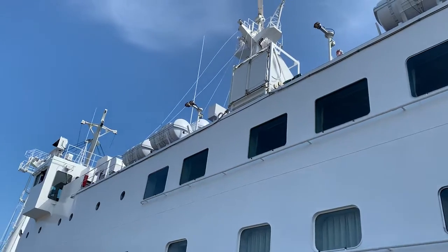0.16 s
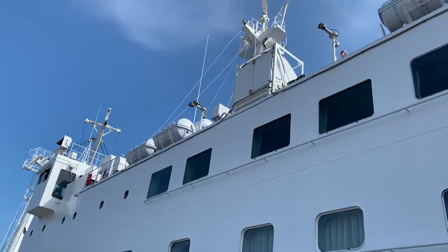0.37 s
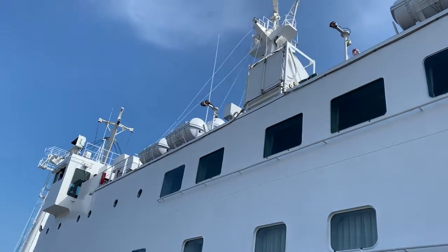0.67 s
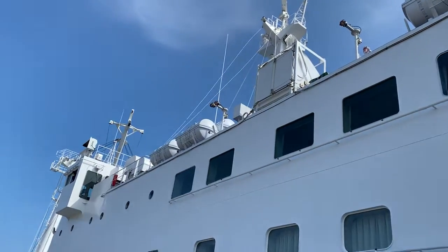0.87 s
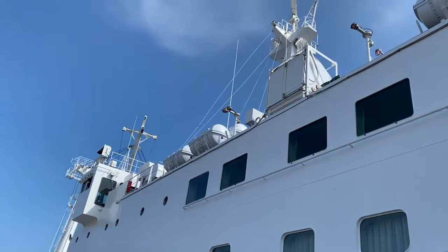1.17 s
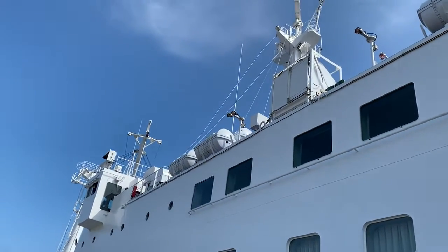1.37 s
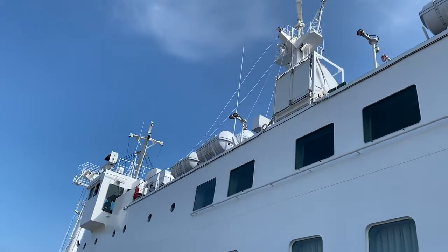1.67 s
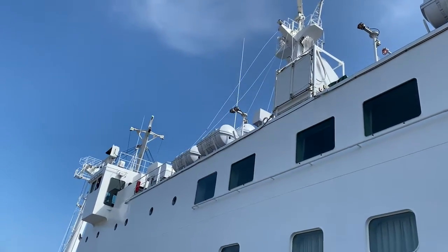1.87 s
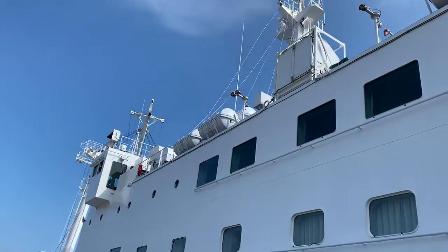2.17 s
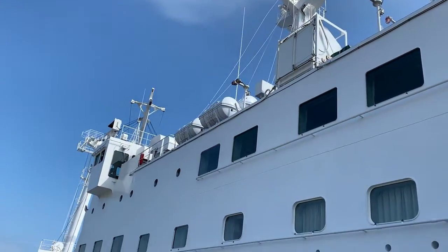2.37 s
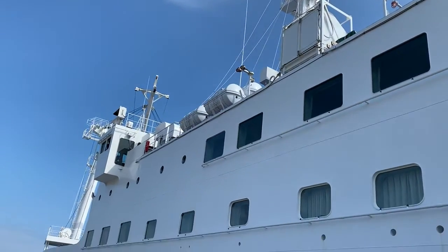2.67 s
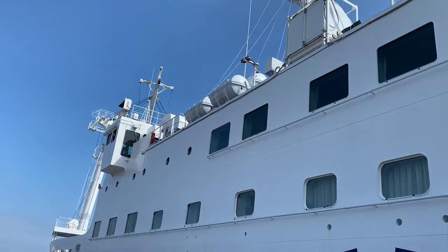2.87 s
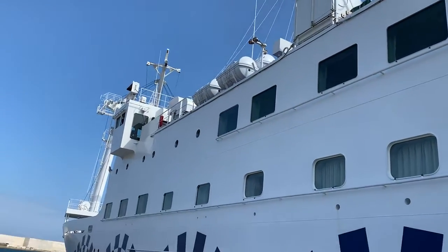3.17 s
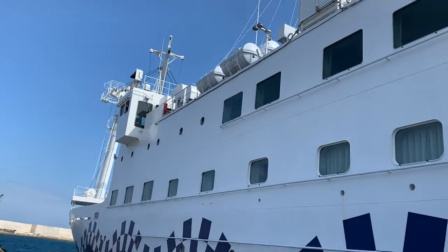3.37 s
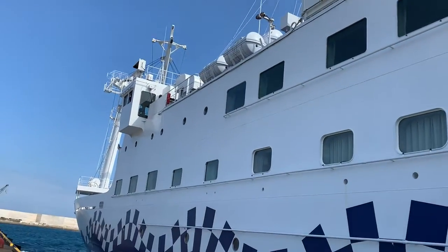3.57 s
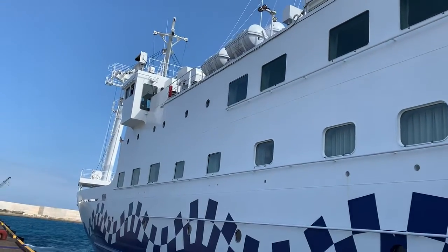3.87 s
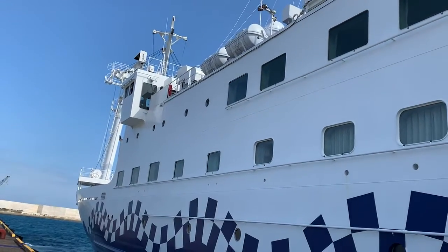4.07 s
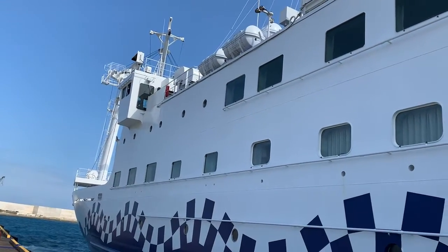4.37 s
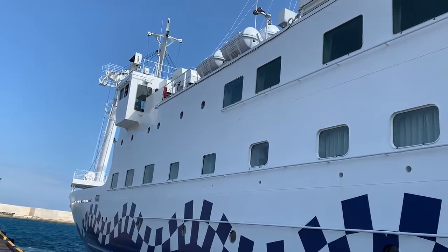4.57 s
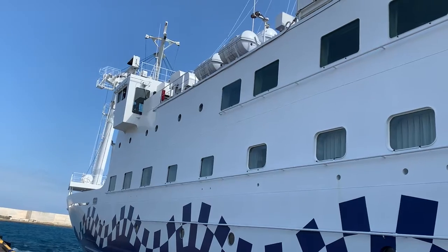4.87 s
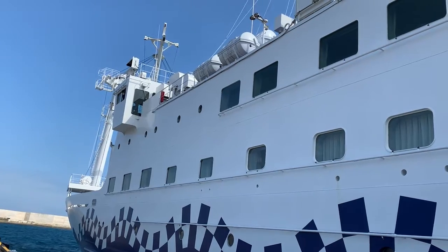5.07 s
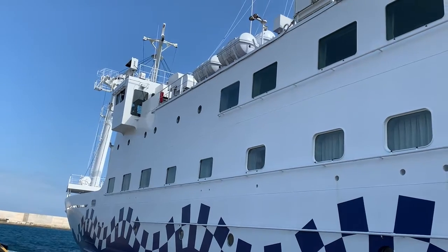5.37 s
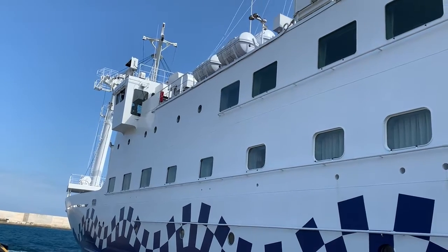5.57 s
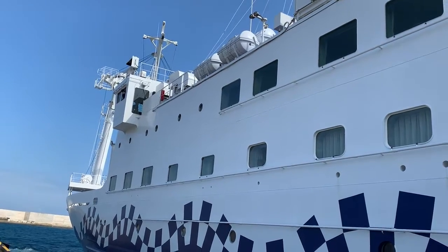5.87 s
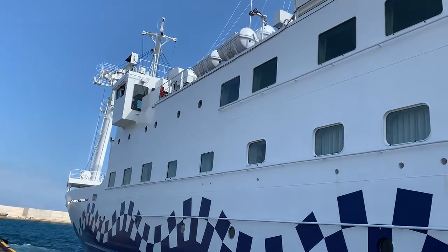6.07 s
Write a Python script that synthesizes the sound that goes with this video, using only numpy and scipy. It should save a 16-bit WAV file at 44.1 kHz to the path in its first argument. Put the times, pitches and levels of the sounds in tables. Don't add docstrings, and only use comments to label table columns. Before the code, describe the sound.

The sound begins in the middle of a ferry horn blast: one loud, low, steady note, around 180 hertz, thick with buzzing brassy overtones and hiss pulsing with the note. Its pitch never moves, but reflections make the tone shimmer and waver, brightening a little at moments. Wind buffets softly underneath. At about 2.25 seconds the horn stops abruptly with a tiny puff of air; the quay answers at once, the breakwater until about 2.6, and a thin, far-off echo of the same note fades until about 4.4. Small wind thumps come around 2.4 to 2.9, then a calmer gap with a low distant wash of engines and water. From about 4.1 to the end near 6.2, gusts rumble and flap on the close stereo microphone, with short crackling slaps, strongest around 4.9, 5.25 and 5.6, leaning left.

```python
import sys
import numpy as np
from scipy import signal
from scipy.io import wavfile
from scipy.ndimage import uniform_filter1d

SR = 44100
rng = np.random.default_rng(int(sys.argv[2]) if len(sys.argv) > 2 else 0)


def log_audio(samples):
    frames = np.atleast_2d(samples).T
    limited = np.clip(frames, -1, 1)
    pcm = np.round(limited * 32767).astype(np.int16)
    wavfile.write(sys.argv[1], SR, pcm)


def elevation(decibels):
    levels = np.asarray(decibels, float)
    return 10 ** (levels / 20)


N = 273640

PITCH_HZ = 179.45
PORT_DELAY_S = 0.00023
CALM_DB = -41.5

# f/Hz, likeness/-1 to 1
PORT_LIKENESS = [(60, 0.67), (150, 0.7), (380, 0.4), (950, 0.078), (2380, -0.019), (5980, -0.058),
                 (15000, -0.078)]
# t/s, level/dB
BREEZE = [(0.0, -34), (0.6, -33.5), (1.45, -36.5), (1.6, -41.5), (1.93, -39.5), (2.05, -34.5), (2.6, -44),
          (3.0, -47.5), (4.0, -57), (4.4, -46.5), (4.8, -65), (5.1, -43.5), (5.6, -43), (5.9, -43),
          (6.2, -46)]


def evened(x):
    return x / np.sqrt(np.mean(abs(x) ** 2) + 1e-20)


def read(points, hz):
    f, value = np.transpose(points)
    return np.interp(np.log(hz + 1), np.log(f + 1), value)


def column(rows, t, order):
    return np.interp(t, [r[0] for r in rows], [r[order] for r in rows])


def bump(t, s, half_s):
    return np.exp(-((t - s) / half_s) ** 2)


def wander(t, hz):
    f = np.geomspace(hz / 12, hz, 10) * rng.choice([-1, 1], 10)
    phasors = np.exp(2j * np.pi * (f * t[:, None] + rng.random(10)))
    return evened((phasors / abs(f) ** 0.1).sum(1))


def noise(shape, likeness, size, patchy_db, flicker_db, flicker_s):
    hop = size // 4
    frames, hz = N // hop + 5, np.fft.rfftfreq(size, 1 / SR)
    a, b, c, d, patches = rng.standard_normal((frames, len(hz), 5)).T
    patches = evened(uniform_filter1d(uniform_filter1d(patches, 5, 0), 8, 1))
    same = np.clip(read(likeness, hz), -1, 1)[:, None]
    left = a + 1j * b
    right = same * left + np.sqrt(1 - same ** 2) * (c + 1j * d)
    z = np.array([left, right])
    z *= elevation(shape(hz[:, None], np.arange(frames) * hop / SR) + patchy_db * patches)
    span = max(int(flicker_s * SR), 1)
    lumps = evened(uniform_filter1d(uniform_filter1d(rng.standard_normal(N), span), span))
    return signal.istft(z, nperseg=size, noverlap=size - hop)[1][:, :N] * elevation(flicker_db * lumps)


def loudness(t, order):
    # held level/dB, release/dB per s, quay echo/dB, breakwater echo/dB
    voices = [
        (-13.5, 108, -15.5, -16.5),
        (-14.5, 300, -17.5, -18),
        (-26, 141, -17, -19),
        (-37, 89, -2.5, -32),
    ]
    # level under the note/dB, fade/dB per s
    far_shore = [
        (-20.5, 23),
        (-38, 35),
        (-26.5, 3),
        (-28, 4),
    ]
    echo_delays = [
        0.14,
        0.352,
    ]
    # t/s, level/dB
    pressure = [(0.0, -3), (0.3, 0), (0.55, -1.5), (1.13, 1), (1.26, 0), (1.39, 2), (1.54, -0.5), (1.99, 1),
                (2.2, -2)]
    pressure_share = (0.046, 0.05, 0.84, 1.0)
    # t/s, depth/dB
    dents = [(0.33, 6.5), (0.46, 1), (0.5, 3), (0.73, 5.5), (0.87, -2.5), (1.14, 2.5), (1.37, 4),
             (1.46, 2.5), (1.52, 5), (2.16, -2)]
    dent_share = (1.06, 1.34, 0.076, 0.1)
    stop_s, far_end_s = 2.252, 4.37
    held_db, release, *echo_db = voices[order]
    far_db, fade = far_shore[order]
    since_stop = np.maximum(t - stop_s, 0)

    gain = elevation(-release * since_stop) ** 2
    for late, db in zip(echo_delays, echo_db):
        gain = gain + elevation(db - 810 * np.maximum(t - stop_s - late, 0)) ** 2
    gain = gain + elevation(far_db - fade * since_stop - 27 * np.maximum(t - far_end_s, 0)) ** 2
    db = held_db + 10 * np.log10(gain) + pressure_share[order] * column(pressure, t, order=1)
    db = db - dent_share[order] * sum(depth * bump(t, s, half_s=0.015) for s, depth in dents)

    cancel_db, clear_s, clearing_s, grow_db_per_s = -13.5, 0.45, 0.026, 2.0
    cancelled = cancel_db / (1 + np.exp((t - clear_s) / clearing_s))
    cancelled = cancelled + grow_db_per_s * np.minimum(t - stop_s, 0)
    return db + (order == 1) * cancelled


def horn():
    # multiple, level/dB
    overtones = [(1, 0), (2, -4), (3, -20), (4, -22), (5, -18.5), (6, -26), (7, -27.5), (8, -23.5),
                 (9, -27.5), (10, -39), (11, -29.5), (12, -22.5), (13, -30), (14, -27), (15, -30),
                 (16, -34), (17, -29), (18, -43), (19, -32.5), (20, -38), (21, -52.5), (22, -31.5),
                 (23, -34), (24, -39.5), (25, -43), (26, -39), (27, -54), (28, -40.5), (29, -38), (30, -53)]
    # f/Hz, level/dB
    top_overtones = [(3180, -31), (5400, 1), (5900, -2.5), (6170, 4.5), (6710, 1), (7500, -17.5),
                     (7900, -10.5), (8190, -3.5), (8830, -3.5), (9520, -7), (10900, -6.5), (11800, -57),
                     (12300, -14), (13300, -18), (15600, 5.5)]
    # f/Hz, left minus right/dB
    horn_pan = [(180, -3), (360, 2), (3000, 1.5), (3900, -2), (4500, -3), (5500, -5), (9000, 1.5),
                (15000, -2)]
    # share/0-1, beat/Hz, first dip left t/s, first dip right t/s, left minus right/dB
    beats = [(0.6, 0.55, 1.72, 1.64, 6.1), (0.45, 0.2, 4.04, 4.76, -4.2), (0.3, 0.4, 1.48, 0.16, -2.1),
             (0.45, 0.95, 0.2, 0.24, -2.8), (0.3, 0.3, 1.8, 2.48, -1.6), (0.9, 0.3, 2.64, 3.28, 0.4),
             (0.45, 1.15, 0.2, 0.24, -0.6), (0.45, 1.0, 0.6, 0.56, -0.9), (0.3, 0.55, 1.8, 1.2, 8.6),
             (0.3, 1.0, 0.16, 0.88, 0.5), (0.9, 0.35, 2.8, 2.84, 2.5), (0.75, 0.3, 0.56, 3.08, 3.2),
             (0.45, 0.4, 0.56, 0.52, -2.5), (0.45, 1.5, 0.32, 0.32, -0.9)]
    # share/0-1, f/Hz, first dip t/s
    sway = (0.5, 1.67, 0.52)
    t, out = np.arange(int(4.5 * SR)) / SR, np.zeros((2, N))
    slow = t[::128]
    multiples = np.arange(1, 86)
    top_db = -43 + read(top_overtones, multiples[30:] * PITCH_HZ)
    order_db = np.append(np.transpose(overtones)[1], top_db)
    group = np.digitize(multiples, [2, 3, 17])
    for g in range(4):
        order_db[group == g] -= 10 * np.log10(np.sum(elevation(order_db[group == g]) ** 2) / 2)
    level_db = [loudness(slow, order=g) for g in range(4)]
    ended = np.clip((slow - 2.26) / 0.091, 0, 1)
    stirred = np.minimum(elevation(0.54 * (column(BREEZE, slow, order=1) + 36)), 1.3)
    turn = np.exp(2j * np.pi * PITCH_HZ * t)
    carrier = np.ones(len(t), complex)

    for k, g, db in zip(multiples, group, order_db):
        stop = len(t) if k < 17 else int((3.2 if k < 24 else 2.7) * SR)
        carrier = carrier[:stop] * turn[:stop]
        if 3 <= k <= 16:
            share, beat_hz, *dips, pan_db = beats[k - 3]
        else:
            share, beat_hz = sway[0] * (16 < k <= 30), sway[1]
            dips, pan_db = [sway[2], sway[2]], read(horn_pan, k * PITCH_HZ)
        scatter = min(0.066 + 0.027 * k, 0.9) * (1 - ended) + 0.9 * ended
        drift_hz = 2.978 + 0.25 * k
        start, shared = rng.random(), wander(slow, drift_hz)
        shake = wander(slow, 45) * stirred
        start = 0.5 if k < 3 else start
        shake_share = 0.16 / k ** 1.8 + 0.14 + 0.004 * k
        for side, sign in enumerate((1, -1)):
            spread = min(0.066 * k, 1.5) * rng.random() / (1 + 2 * (k > 16))
            lag = np.exp(1j * (2 * np.pi * start + sign * spread))
            beat = 1 - share * np.exp(2j * np.pi * beat_hz * (slow - dips[side]))
            beat = beat / np.sqrt(1 + share ** 2)
            alike = min(0.5 + 0.0048 * k, 0.95)
            echo = alike * shared + np.sqrt(1 - alike ** 2) * wander(slow, drift_hz)
            path = np.sqrt(1 - scatter ** 2) * lag * beat + scatter * echo
            path *= 1 + shake_share * shake
            path *= elevation(db + level_db[g] + sign * pan_db / 2)
            path *= np.exp(-1j * np.pi * sign * (k > 16) * k * PITCH_HZ * PORT_DELAY_S)
            out[side, :stop] += (np.interp(t[:stop], slow, path) * carrier).real
    return out


def air():
    # f/Hz, level/dB per Hz
    air_spectrum = [(600, -33), (1000, -2), (3000, -15), (4200, -13), (6600, -15.5), (7400, -25),
                    (8100, -14), (9500, -13), (10900, -21), (11200, -61), (12000, -63), (12400, -16),
                    (14000, -23), (15600, -31)]
    # f/Hz, likeness/0-1
    air_likeness = [(900, 0.24), (4000, 0.31), (8000, 0.27), (15000, 0.48)]
    # t/s, length/s, level/dB
    valve_puff = (2.262, 0.013, -29.5)
    t = np.arange(N) / SR
    hiss = noise(lambda hz, s: read(air_spectrum, hz) + 0 * s, air_likeness, size=512,
                 patchy_db=2.5, flicker_db=0.7, flicker_s=0.02)
    hiss = np.array([np.roll(hiss[0], round(PORT_DELAY_S * SR)), hiss[1]])
    puffs = 1 + 0.75 * np.cos(2 * np.pi * PITCH_HZ * t)
    s, length_s, valve_db = valve_puff
    band = signal.butter(2, [1300, 3200], "bandpass", fs=SR, output="sos")
    valve = evened(signal.sosfilt(band, hiss)) * bump(t, s, length_s) * elevation(valve_db)
    hiss_db = np.interp(t, t[::128], loudness(t[::128], order=3)) - 8
    return evened(hiss) * puffs * elevation(hiss_db) + valve


def blowing(t):
    # t/s, half length/s, buffet level/dB, rumble relative to it/dB
    gusts = [(0.18, .06, -38.5, 1), (0.455, 0.071, -34, -22), (0.609, 0.1, -24.5, -5),
             (0.762, 0.057, -32, -22), (1.122, 0.059, -28.5, -17), (1.329, 0.09, -33.5, -13),
             (1.474, 0.067, -33.5, -8), (2.01, 0.048, -26, -12), (2.212, 0.054, -25.5, -17),
             (2.409, .025, -27, 4), (2.536, 0.041, -31.5, 0), (2.701, 0.011, -28.5, -20),
             (2.893, 0.018, -38.5, -11), (4.1, 0.04, -32.5, -9), (4.281, 0.013, -31.5, -11),
             (4.36, 0.063, -43, 7), (4.516, 0.054, -35.5, 5.5), (4.708, 0.038, -40, 7),
             (4.8, .06, -57.5, 16), (4.897, 0.028, -33.5, -10), (4.974, 0.084, -33.5, 8.5),
             (5.199, 0.027, -35, -2), (5.251, .008, -24, 16), (5.463, 0.072, -34.5, 12),
             (5.516, 0.013, -26, 1), (5.6, 0.043, -29, -1), (5.666, 0.034, -29, 1.5),
             (5.793, 0.066, -29, 0), (6.023, 0.045, -57, 28.5), (6.096, 0.019, -32, 7)]
    breeze_db = column(BREEZE, t, order=1)
    rumble = elevation(-35.5 + 0.19 * (breeze_db - CALM_DB))
    buffet = elevation(breeze_db)
    for s, half_s, db, rumble_db in gusts:
        puff = elevation(db) * bump(t, s, half_s)
        rumble = rumble + elevation(rumble_db) * puff
        buffet = buffet + puff
    return 20 * np.log10(rumble), 20 * np.log10(buffet)


def wind():
    # f/Hz, level/dB per Hz
    rumble_spectrum = [(12, -34.5), (20, -14.5), (31, -2.5), (54, 8), (300, -13.5), (390, -47.5),
                       (660, -120)]
    # f/Hz, level/dB per Hz
    buffet_spectrum = [(53, -32), (90, -6.5), (168, 2.5), (227, 2), (260, 1), (323, -2), (437, -1.5),
                       (500, -3.5), (870, -19.5), (1680, -30), (5000, -63), (6500, -88), (11000, -120)]
    t = np.arange(N) / SR
    rumble = noise(lambda hz, s: read(rumble_spectrum, hz) + 0 * s, PORT_LIKENESS, size=2048,
                   patchy_db=0.0, flicker_db=3.0, flicker_s=0.014)

    def gusty(hz, s):
        tilt = np.clip(0.11 * (blowing(s)[1] - CALM_DB), -8, 3)
        return read(buffet_spectrum, hz) + tilt * np.log2(np.clip(hz, 100, 600) / 275)

    buffet = noise(gusty, PORT_LIKENESS, size=512, patchy_db=3.0, flicker_db=3.5, flicker_s=0.01)
    rumble_db, buffet_db = (np.interp(t, t[::64], db) for db in blowing(t[::64]))
    return evened(rumble) * elevation(rumble_db - 2.0) + evened(buffet) * elevation(buffet_db + 5.5)


def wash():
    # f/Hz, level/dB per Hz
    wash_spectrum = [(18, -38), (30, 1.5), (75, -3.5), (270, -5), (600, -21), (1230, -22.5), (2600, -34.5),
                     (3100, -37.5), (7000, -46), (10900, -52.5), (11300, -75.5), (12100, -78.5),
                     (12500, -55), (15600, -62)]
    bed = noise(lambda hz, s: read(wash_spectrum, hz) + 0 * s, PORT_LIKENESS, size=1024,
                patchy_db=0.5, flicker_db=-1.5, flicker_s=0.015)
    return elevation(-38.5) * evened(bed)


def slaps():
    # t/s, peak level/dB, thump relative to it/dB, left minus right/dB
    slap_events = [(2.4577, -35.5, 22.5, 10), (2.5051, -40, 3, 0.5), (2.5718, -36, 8, 7),
                   (2.6912, -42.5, 21.5, 5), (2.8862, -44, 10, -6), (4.0975, -32, 11, 5),
                   (4.3084, -35, 9, 4), (4.3682, -38, 11, -6), (4.4500, -41.5, 19, 7),
                   (4.4769, -38.5, 23.5, 3), (4.516, -31.5, 10.5, 12), (4.6955, -42.5, 20, 2),
                   (4.747, -37, 4, 4), (4.8909, -27, 9.5, 9), (4.9361, -32.5, 1, 15),
                   (4.9615, -31.5, 5, 13), (5.0069, -37, -7, 8), (5.0267, -30, 9, 9),
                   (5.2427, -26.5, 6.5, 9.5), (5.444, -41, 15, 15), (5.519, -51, 18, 7),
                   (5.5372, -32.5, 2, 3), (5.5697, -34.5, 19, 5.0), (5.5846, -34.5, 12, 3),
                   (5.5993, -23, 5, 8), (5.6278, -30, -1, 8), (5.6611, -36.5, 22, 8), (5.6993, -38, 7, 1),
                   (5.7916, -29.5, 14, 4), (6.091, -43.5, 25.5, 6)]
    out, t = np.zeros((2, N + 2000)), np.arange(600) / SR
    chance = rng.random((len(slap_events), 3))
    grains = rng.standard_normal((len(slap_events), 2, len(t)))
    swing = np.sin(np.pi * np.minimum(t / 0.0079, 1)) ** 2
    for (s, peak_db, thump_db, pan_db), (a, b, c), grain in zip(slap_events, chance, grains):
        crackle = signal.butter(3, [750, 1790 + 390 * c], "bandpass", fs=SR, output="sos")
        sharp = signal.sosfilt(crackle, grain * t * np.exp(-t / 0.0008))
        sharp /= abs(sharp).max(1, keepdims=True)
        dull = swing * np.cos(2 * np.pi * ((280 + 400 * a) * t + b))
        at = round(s * SR)
        sides_db = np.array([[0.5], [-0.5]]) * pan_db
        slap = elevation(1.0 + 1.37 * sides_db) * sharp + elevation(thump_db - 3 + 0.34 * sides_db) * dull
        out[:, at:at + len(t)] += elevation(peak_db) * slap
    return out[:, :N]


def scene():
    return horn() + air() + wind() + wash() + slaps()


def top_cut(x):
    return signal.sosfilt(signal.butter(12, 15720, fs=SR, output="sos"), x)


def record(dry):
    # t/s, mono below f/Hz
    bass_mono = [(0, 18), (4.35, -2), (4.55, 116), (4.85, 310), (6.2, 308)]
    dry = signal.sosfilt(signal.butter(3, 36, "highpass", fs=SR, output="sos"), dry)
    mid, side = (dry[0] + dry[1]) / 2, (dry[0] - dry[1]) / 2
    hz, t, z = signal.stft(side, SR, nperseg=2048)
    edge_hz = column(bass_mono, t, order=1)
    z /= 1 + (edge_hz / (hz[:, None] + 1)) ** 8
    side = signal.istft(z, SR, nperseg=2048)[1][:N]
    return top_cut(np.array([mid + side, mid - side]))


dry = scene()
out = record(dry)
log_audio(out)
```